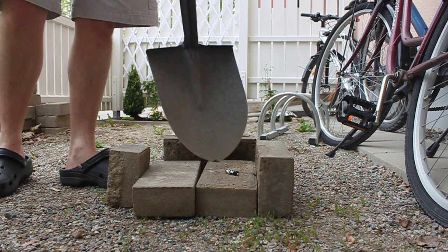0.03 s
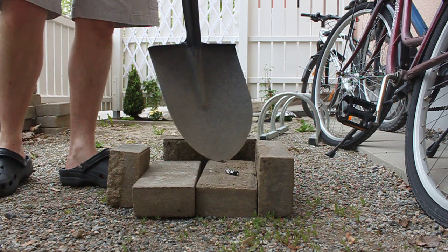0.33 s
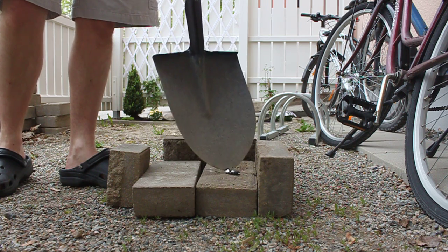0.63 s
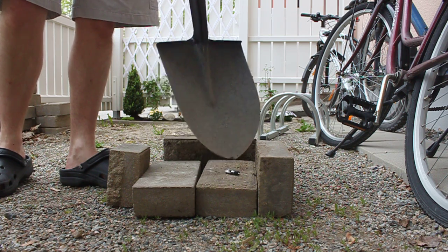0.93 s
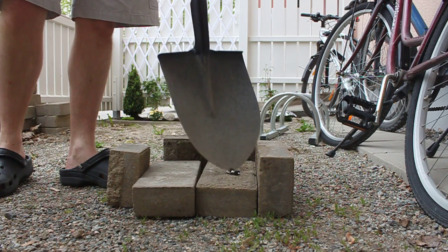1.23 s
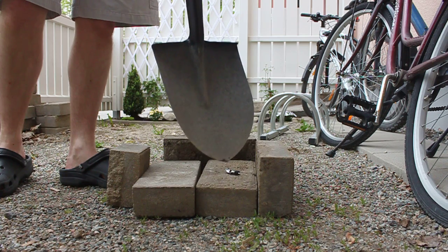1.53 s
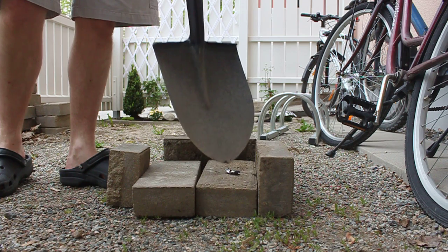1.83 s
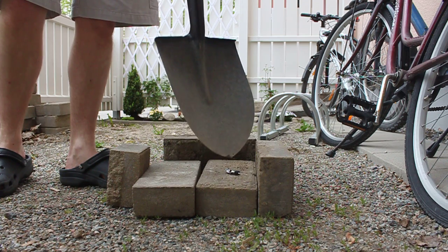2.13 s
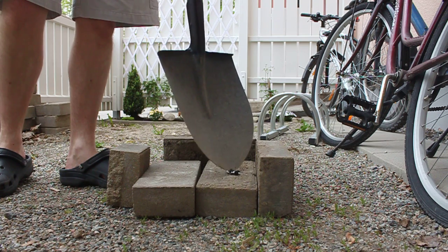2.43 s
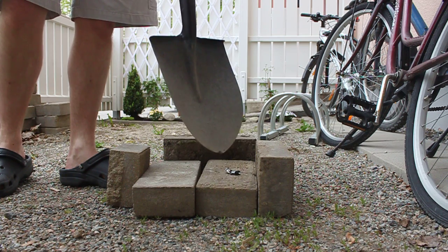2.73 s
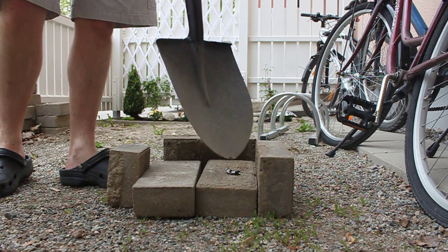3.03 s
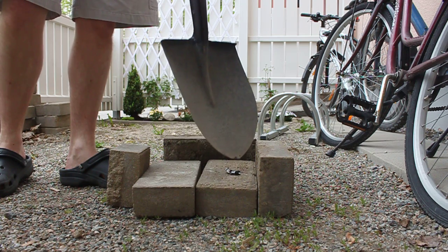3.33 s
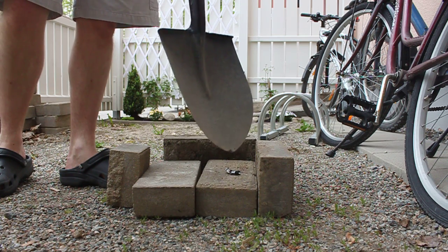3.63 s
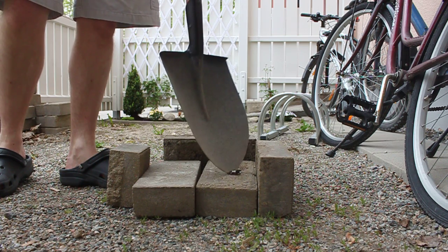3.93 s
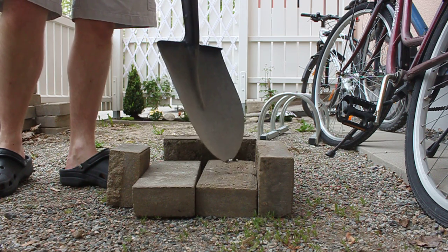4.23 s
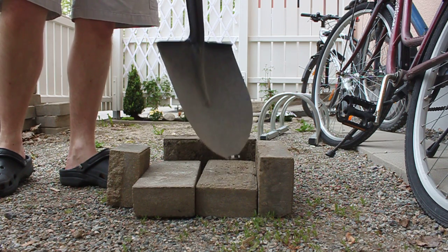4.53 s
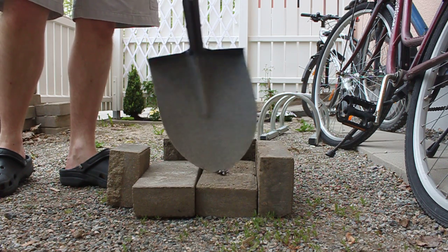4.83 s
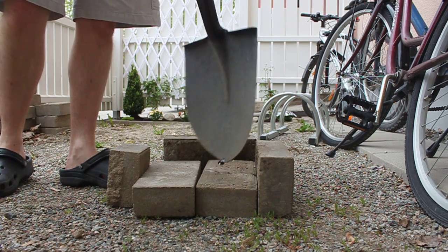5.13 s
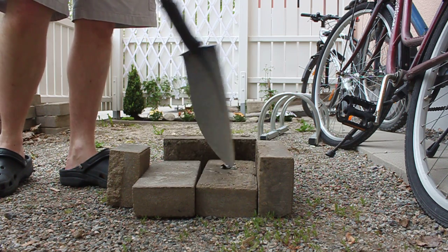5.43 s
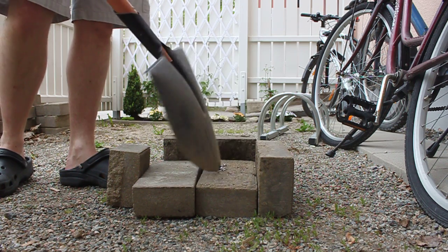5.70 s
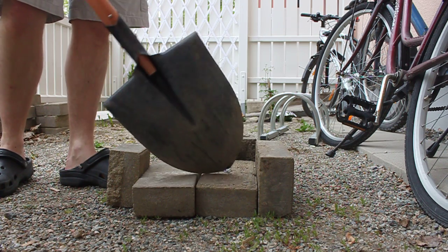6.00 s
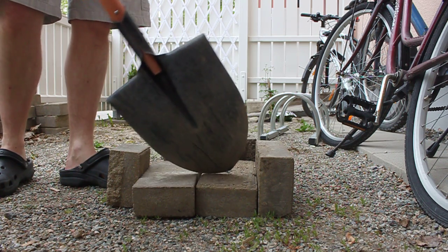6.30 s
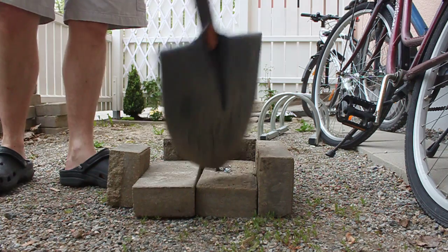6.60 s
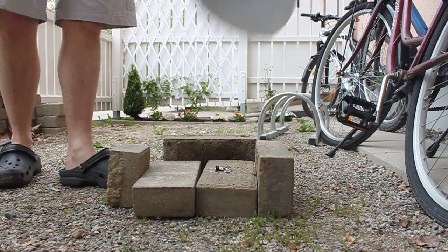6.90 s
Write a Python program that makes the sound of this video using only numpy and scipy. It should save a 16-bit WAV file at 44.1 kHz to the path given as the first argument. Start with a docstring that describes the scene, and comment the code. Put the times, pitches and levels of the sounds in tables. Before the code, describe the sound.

A steel spade jabs a small battery on concrete, clanking, ringing and scraping over a steady outdoor murmur.

```python
"""A steady outdoor murmur with a faint hum fills a yard. Close by, a steel spade is jabbed seven times
onto a small battery lying on a concrete paver: grit cracks, the blade rings, shaft and stone thud.
After the last jab the blade skids off, scrapes over the stone and lifts clear, ringing freely.
Chips tick down, a far bird trills and a shoe shifts on gravel.
A gain control ducks everything after the hardest blows and creeps back up."""
import sys
import numpy as np
from scipy import signal
from scipy.fft import rfft, irfft
from scipy.io import wavfile
from scipy.ndimage import uniform_filter1d

SR = 44100
rng = np.random.default_rng(int(sys.argv[2]) if len(sys.argv) > 2 else 0)


def wav_record(signal):
    """Record a signal, one row per channel, as 16-bit PCM in the file named by sys.argv[1]."""
    frames = np.transpose(np.atleast_2d(signal))
    bounded = np.clip(frames, -1, 1)
    # unit amplitude maps onto the largest positive 16-bit level
    quanta = np.round(bounded * 32767).astype(np.int16)
    wavfile.write(sys.argv[1], SR, quanta)


N = 306936
TIME = np.arange(N) / SR

# Seven jabs, then two knocks as the blade lifts clear: start_s, contact_s, crack_db (over the ring-out),
# level_db, body_db and fizz_db (both relative to level_db), shaft_db, paver_db, then one ring_db each
# for mode families 0-3, which depend on where the blade is struck and held
BLOWS = [(.583, .0016, -3, -34.5, -6, -2, -17, -35, -33, -45, -60, -62),
         (1.0715, .0018, -6, -21.5, -6, -4, -17, -14.5, -36.5, -48, -35, -50),
         (2.2438, .001, 1, -26.5, -9, 2, -14.5, -18.5, -35, -37, -48, -62),
         (3.7542, .0008, 1, -7, -3.5, 3.5, 0, 3, -32, -39, -6, -43),
         (4.3306, .0008, -7, -12, -3, -2, -12, -18, -13.5, -22, -43, -47),
         (4.787, .0007, -8, -3.5, 2.5, -1.5, -5, 8.5, -16, -11, -35, -39),
         (5.4187, .0009, -1.5, -6.3, 0, -.5, -6, 12.3, -14, -25.5, -35, -39),
         (6.4705, .002, -3, -27, -11, -1, -50, -45, -31, -55, -59, -49),
         (6.5455, .004, -4, -15.5, -17, -2.5, -40, -37, -50, -44, -50, -28.5)]


def amp(db):
    """Decibels to gain."""
    return 10 ** (np.asarray(db) / 20)


def unit_rms(x):
    """Scales to rms 1."""
    return x / np.sqrt(np.mean(x ** 2) + 1e-20)


def add(mix, start_s, sound):
    """Mixes a sound in at its start time."""
    part = mix[round(start_s * SR):][:len(sound)]
    part += sound[:len(part)]


def band(x, lo_hz, hi_hz, order=3):
    """Causal band-pass."""
    edges_hz = [lo_hz, min(hi_hz, SR / 2 - 100)]
    return signal.sosfilt(signal.butter(order, edges_hz, "band", fs=SR, output="sos"), x)


def coloured(x, points):
    """Shapes x with an EQ curve of (freq_hz, gain_db) points, at rms 1."""
    hz, db = np.transpose(points)
    gain = amp(np.interp(np.log(np.fft.rfftfreq(len(x), 1 / SR) + 1), np.log(hz), db))
    return unit_rms(irfft(rfft(x) * gain, len(x)))


def drift(rate_hz):
    """Slow random wander of rms 1."""
    knots = np.arange(0, TIME[-1] + 1, .5 / rate_hz)
    return unit_rms(np.interp(TIME, knots, rng.standard_normal(N)[:len(knots)]))


def swell(t, rise_s):
    """A push that peaks after the rise time and dies away."""
    return t / rise_s * np.exp(1 - t / rise_s)


def hump(start_s, length_s):
    """A rounded rise and fall, silent outside its span."""
    return np.sqrt(abs(np.sin(np.pi * np.clip((TIME - start_s) / length_s, 0, 1))))


def lagged(x, lag_s):
    """Follows x with a time constant."""
    pole = np.exp(-1 / (lag_s * SR))
    return signal.lfilter([1 - pole], [1, -pole], x)


def yard(rumble_db=-48.9, murmur_db=-49.2, heave_db=1.2, swell_db=.7, waver_hz=.8):
    """The bed: distant traffic rumble and outdoor murmur, with a faint wavering hum."""
    # EQ curves of the traffic and the murmur: freq_hz, gain_db
    rumble_colour = [(15, -44), (28, -24), (45, -11), (68, 0), (95, -5), (140, -2), (180, 1), (240, -5),
                     (350, -22), (900, -60)]
    murmur_colour = [(100, -22), (230, -3), (330, -1), (450, -5), (620, -6), (760, -4), (1000, -6.5),
                     (1840, -14), (2300, -20), (2650, -16), (2880, -9), (3250, -19), (4200, -23.5),
                     (12900, -29.7), (16000, -34)]
    # Tones of the hum: pitch_hz, level_db (relative to the murmur)
    hum_tones = [(544, -7), (726, -6), (2885, -14.5)]
    rumble = coloured(rng.standard_normal(N), rumble_colour) * amp(heave_db * drift(3))
    murmur = coloured(rng.standard_normal(N), murmur_colour) * amp(swell_db * drift(6))
    hum = sum(amp(db) * np.sin(2 * np.pi * np.cumsum(hz + waver_hz * drift(12)) / SR)
              for hz, db in hum_tones)
    return amp(rumble_db) * rumble + amp(murmur_db) * (murmur + hum)


def blade_ring(t, family, scatter_db=0):
    """One family of blade modes dying away; the spot that is touched scatters their strengths."""
    # Modes of the steel blade: pitch_hz, level_db, t60_s,
    # family (0-2 tip resting on battery or stone, 3 blade free, 4 upper modes of every contact)
    modes = [(1387, -.5, .4, 0), (1753, -18, .36, 0), (2170, -16, .32, 0), (2072, 0, .27, 0),
             (2066, -1, .95, 1), (2486, -12, .8, 1), (1560, -11, .63, 1), (1260, -1, .3, 2),
             (2083, -6, .27, 2), (2492, -8, .4, 2), (3025, 5, .13, 2), (1191, 0, 1.05, 3),
             (1357, -2, .58, 3), (1543, -1, 1.2, 3), (1750, -9, 1.2, 3), (1997, 0, .5, 3),
             (2865, 26, .06, 3), (4231, 9, .2, 3), (4570, 17, .12, 3), (5080, 19, .14, 3),
             (1600, 4, .11, 4), (2935, 4, .09, 4), (3178, 2, .11, 4), (3440, -4, .12, 4),
             (4428, -1.5, .13, 4), (4850, 2, .13, 4), (5188, -5, .15, 4), (8740, -9, .12, 4),
             (11447, -4, .11, 4), (12250, -2.5, .11, 4)]
    hz, db, t60, _ = np.array([mode for mode in modes if mode[3] == family]).T[:, :, None]
    strength = amp(db + scatter_db * rng.uniform(-1, 1, db.shape))
    return (strength * amp(-60 * t / t60) * np.sin(2 * np.pi * hz * t)).sum(0)


def plate_modes(size, spacing_hz=80, spread_db=7):
    """The blade's thicket of plate modes: unevenly spaced partials of very unequal strength, rms 1."""
    offset, phase = rng.random((2, 600))
    strength = amp(spread_db * np.clip(rng.standard_normal(len(offset)), -2, 2))
    bins = ((np.arange(len(offset)) + offset) * spacing_hz * size / SR).astype(int)
    spectrum = np.zeros(size // 2 + 1, complex)
    in_range = bins < size // 2
    spectrum[bins[in_range]] = (strength * np.exp(2j * np.pi * phase))[in_range]
    return unit_rms(irfft(spectrum, size))


def band_levels(db, body_db, fizz_db, knock_db, clang_db):
    """Levels in five bands: weight behind a contact lifts the low ones, a sharp edge the top one."""
    return db + np.array([body_db + knock_db, body_db, body_db / 2 + clang_db, 0, fizz_db])


def contact(contact_s, crack_db, levels_db, modes_db, graininess, noise_db=-10):
    """Steel crushes grit: a burst of micro-impacts, the blade's dense ring-out and the yard's echo."""
    # Decay of blade and yard in five bands, low to high: ring_t60_s, echo_db, echo_t60_s
    decays = [(.08, -24, .4), (.11, -19, .4), (.14, -20, .36), (.13, -21, .32), (.105, -24, .27)]
    # Crossovers of those bands: edge_hz
    edges_hz = [180, 480, 1100, 2600, 7000, 16500]
    t = np.arange(16384) / SR
    force = swell(t, contact_s)
    build_up = np.cumsum(force) / force.sum()  # the blade gathers energy while the contact lasts
    age = np.maximum(t - 2 * contact_s, 0)
    impacts, sizes, scatter = rng.standard_normal((3, len(t)))
    clumps = unit_rms(uniform_filter1d(sizes, size=60))  # grit gives way about a millisecond at a time
    burst = impacts * np.exp(graininess * np.clip(clumps, -2, 2)) * force
    plate = plate_modes(len(t))  # every spot of the edge wakes a different set
    upper = amp(modes_db) * blade_ring(t, family=4, scatter_db=6)
    sound = np.zeros(len(t))
    for k, ((t60, echo_db, echo_t60), level_db) in enumerate(zip(decays, levels_db)):
        near = (plate + amp(noise_db) * scatter) * amp(-60 * age / t60)
        echo = (.5 * plate + scatter[::-1]) * amp(echo_db - 60 * age / echo_t60)
        crack = unit_rms(band(burst, *edges_hz[k:k + 2]))
        ring_out = unit_rms(band(build_up * (near + echo + upper), *edges_hz[k:k + 2]))
        sound += amp(level_db) * unit_rms(amp(crack_db) * crack + ring_out)
    return sound * np.sqrt(.04 / t[-1])  # each band has the energy of 40 ms at its level


def stick_slip(every_s=.022, jitter_s=.0015, drag_slip_s=.006, spread_db=.8):
    """Cues single slips, the stutter of each drag, and a faint noise leading into each blow."""
    # Single slips on the stone: start_s, slip_s, level_db, body_db (relative to level_db);
    # the row at 5.7425 s is a faint lead-in noise that softens the start of the next scrape
    singles = [(.5765, .0016, -26, -21), (.78, .004, -49, -3), (1.083, .002, -27, -8),
               (4.943, .005, -34, -11), (5.5185, .003, -5.5, -17), (5.7425, .003, -36, -10),
               (5.7485, .002, -21.5, -12), (5.8015, .002, -25.5, -13), (5.912, .005, -38.5, -9),
               (6.253, .004, -46, 3), (6.298, .004, -37, -7), (6.3665, .002, -22, -16),
               (6.524, .005, -35, -6), (6.539, .002, -26, -12)]
    # The blade is dragged: start_s, length_s, level_db (of each slip), body_db (relative to level_db)
    drags = [(5.446, .075, -20, -3), (5.543, .055, -8.7, -18), (5.778, .095, -37.5, -9),
             (6.41, .055, -46, 3)]
    ahead_s, lead_in_s, lead_in_db, lead_in_body_db = .006, .003, -39, -7
    cues = list(singles) + [(s - ahead_s, lead_in_s, lead_in_db, lead_in_body_db) for s, *_ in BLOWS]
    for start_s, length_s, db, body_db in drags:
        for s in np.arange(start_s, start_s + length_s, every_s):
            late, harder = rng.standard_normal(2)
            cues.append((s + jitter_s * late, drag_slip_s, db + spread_db * harder, body_db))
    return cues


def scrapes(rasp_db=-4.5, sing_db=-7):
    """Slips are longer, lighter, grittier contacts; they mostly wake the upper modes."""
    out, t = np.zeros(N), np.arange(SR // 2) / SR
    singing = blade_ring(t, family=0) * (1 - np.exp(-t / .004))  # the low modes sing along
    for start_s, slip_s, db, body_db in stick_slip():
        levels = band_levels(db, body_db, fizz_db=.5, knock_db=-8.5, clang_db=-1.5)
        add(out, start_s, contact(slip_s, rasp_db, levels, modes_db=-7, graininess=1.0, noise_db=-12))
        add(out, start_s, amp(levels[2] + sing_db) * singing)
    return out


def blows():
    """Each blow cracks and sets the blade singing."""
    out, t = np.zeros(N), np.arange(SR) / SR
    for start_s, contact_s, crack_db, db, body_db, fizz_db, _, _, *rings_db in BLOWS:
        levels = band_levels(db, body_db, fizz_db, knock_db=-4.5, clang_db=1)
        add(out, start_s, contact(contact_s, crack_db, levels, modes_db=-15, graininess=.3))
        attack = 1 - np.exp(-t / contact_s)
        for family, ring_db in enumerate(rings_db):
            add(out, start_s, amp(ring_db) * blade_ring(t, family) * attack)
    return out


def thuds(shaft_hz=280, paver_hz=715, ground_hz=68):
    """Shaft, paver and ground take the weight of each blow in a few heavily damped cycles."""
    out, t = np.zeros(N), np.arange(SR // 8) / SR
    for start_s, _, _, _, _, _, shaft_db, paver_db, *_ in BLOWS:
        bodies = [(shaft_hz, .0036, shaft_db), (paver_hz, .0015, paver_db),
                  (ground_hz, .007, shaft_db - 23)]
        for hz, rise_s, db in bodies:
            add(out, start_s, amp(db) * swell(t, rise_s) * np.sin(2 * np.pi * hz * t))
    return out


def fine_grit(flight_s=(.1, .24), chip_db=-19, stray_db=-40, spread_db=3, low_db=-12):
    """Cues two chips landing after each blow, louder the harder it was, and stray grains settling."""
    chips = [(s + flight, db + chip_db)
             for s, _, _, db, *_ in BLOWS for flight in rng.uniform(*flight_s, size=2)]
    strays = [(s, stray_db) for s in rng.uniform(0, TIME[-1], size=14)]
    return [(s, db + spread_db * rng.standard_normal(), low_db) for s, db in chips + strays]


def grit(tick_s=.0007, tail_db=-17, tail_t60_s=.11, trim_db=-6):
    """Tiny stone ticks with a short scatter behind them."""
    # Larger stones that crack or land: start_s, level_db, low_db (under 3.5 kHz, relative to the treble)
    stones = [(.762, -41, 21), (.781, -28, -1), (.83, -31, -3), (1.1, -11, -12), (1.855, -32, -12),
              (2.428, -34, -10), (3.9505, -21, -12), (3.994, -13, -14), (4.843, 5, -6), (5.404, -15, -18),
              (5.886, -12, -14), (6.787, -27, -3), (6.94, -25, 0)]
    out, t = np.zeros(N), np.arange(SR // 6) / SR
    envelope = np.exp(-t / tick_s) + amp(tail_db - 60 * t / tail_t60_s)
    for start_s, db, low_db in list(stones) + fine_grit():
        noise = rng.standard_normal(len(t)) * envelope
        tick = band(noise, 3500, 16000, order=1) + amp(low_db) * band(noise, 1200, 3500)
        add(out, start_s, amp(db + trim_db) * tick)
    return out


def bird(blur_hz=550, flutter_db=2):
    """Each phrase swells and glides; distance smears its notes into a narrow, fluttering band."""
    # Phrases of the trill: start_s, length_s, first_pitch_hz, last_pitch_hz, level_db
    phrases = [(1.33, 1.1, 4850, 3300, -60), (2.95, .95, 3550, 3780, -60.5), (5.1, .55, 4450, 4280, -58)]
    out = np.zeros(N)
    blur = drift(blur_hz) + 1j * drift(blur_hz)
    for start_s, length_s, first_hz, last_hz, db in phrases:
        pitch_hz = np.interp(TIME, [start_s, start_s + length_s], [first_hz, last_hz])
        glide = np.exp(2j * np.pi * np.cumsum(pitch_hz) / SR)
        out += amp(db) * hump(start_s, length_s) * (blur * glide).real
    return amp(flutter_db * drift(12)) * band(out, 2800, 5600)


def shoe_shuffle(grains_per_s=4000, spread_db=3):
    """Gravel grains grind under a sole."""
    # Shifts of the shoe: start_s, length_s, level_db
    shifts = [(6.14, .66, -48), (6.83, .3, -42.5)]
    # EQ curve of the gravel: freq_hz, gain_db
    gravel_colour = [(200, -20), (900, 0), (1600, -2), (2200, -8), (3300, -4), (6000, -13), (15000, -20)]
    grains = rng.standard_normal(N) * (rng.random(N) < grains_per_s / SR)
    grains *= amp(spread_db * np.minimum(rng.exponential(1, N), 4))  # a few grains stick out
    pressure = sum(amp(db) * hump(start_s, length_s) for start_s, length_s, db in shifts)
    return pressure * coloured(grains, gravel_colour)


def gain_control(x, threshold_db=-17.3, sense_s=.01, attack_s=.0005, recover_s=1.43, start_cut_db=6.8):
    """A hard blow pushes the gain down within milliseconds; the yard sinks with it and creeps back."""
    level_db = 10 * np.log10(lagged(x[0] ** 2, sense_s) + 1e-12)
    over_db = np.maximum(level_db - threshold_db, 0)
    recovery = np.exp(-TIME / recover_s)
    cut_db = np.maximum.accumulate(np.maximum(over_db / recovery, start_cut_db)) * recovery
    return x * amp(-lagged(cut_db, attack_s))


def scene():
    """Spade and gravel close by, the yard behind, in mono."""
    return (blows() + thuds() + scrapes() + grit() + shoe_shuffle() + yard() + bird())[None]


def record(dry, ceiling=.77, low_cut_hz=35, high_cut_hz=16100):
    """The microphone tints the top octave; the hardest cracks outrun the gain control and clip softly."""
    hz = np.fft.rfftfreq(N, 1 / SR)
    tint_db = np.interp(hz, [0, 8000, 10500, 13000, 16000], [0, -.7, 1.5, -1.5, -2])
    tinted = irfft(rfft(dry) * amp(tint_db), N)
    clipped = ceiling * np.tanh(gain_control(tinted) / ceiling)
    low_cut = signal.butter(2, low_cut_hz, "high", fs=SR, output="sos")
    high_cut = signal.firwin(301, high_cut_hz, window=("kaiser", 9), fs=SR)
    return signal.oaconvolve(signal.sosfilt(low_cut, clipped), high_cut[None], "same")


dry = scene()
out = record(dry)
wav_record(out)
```